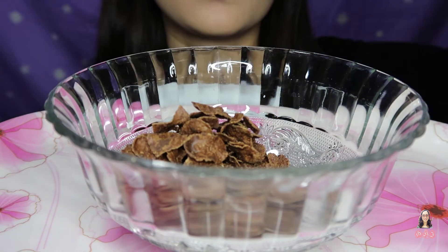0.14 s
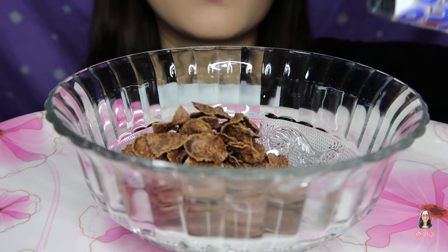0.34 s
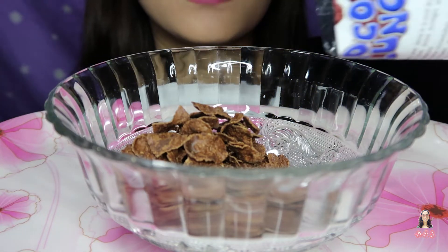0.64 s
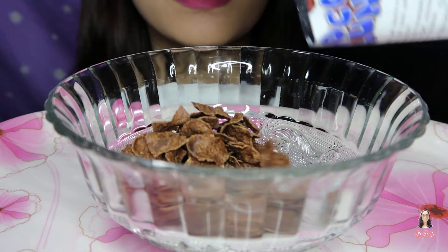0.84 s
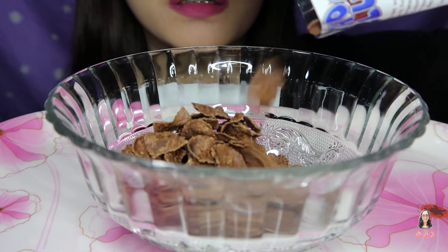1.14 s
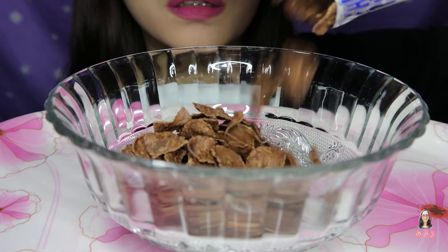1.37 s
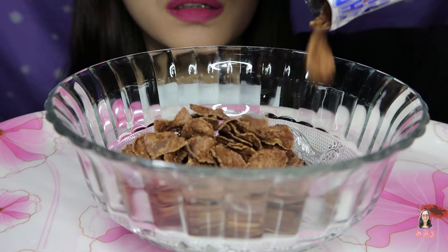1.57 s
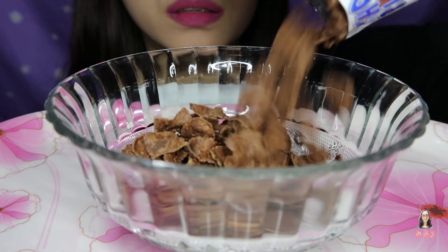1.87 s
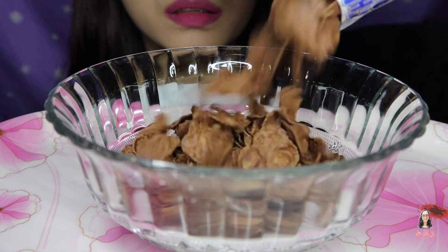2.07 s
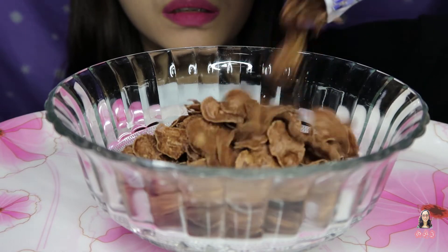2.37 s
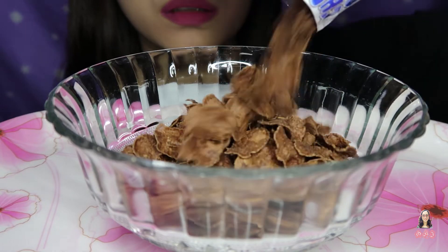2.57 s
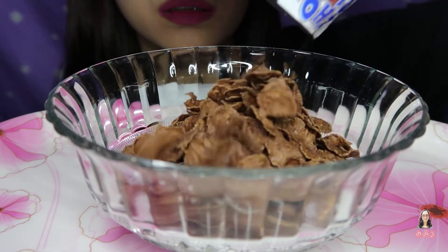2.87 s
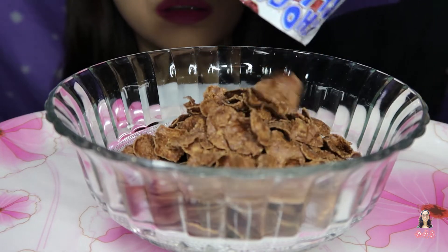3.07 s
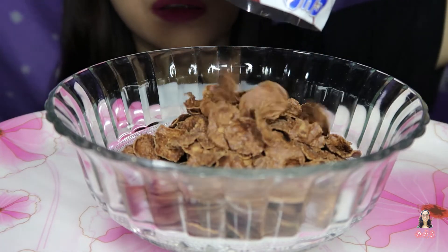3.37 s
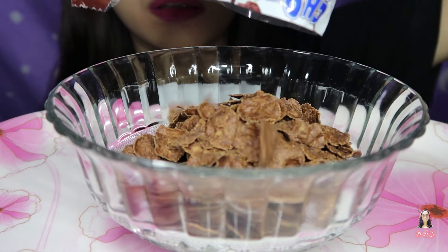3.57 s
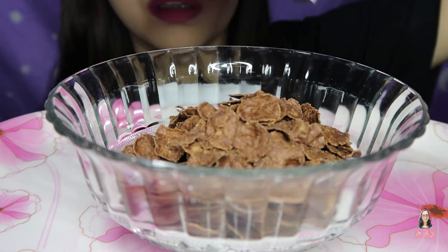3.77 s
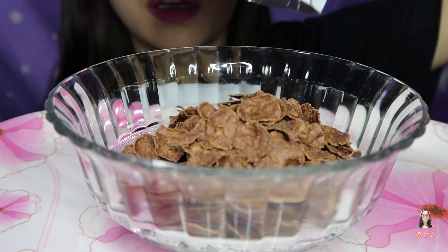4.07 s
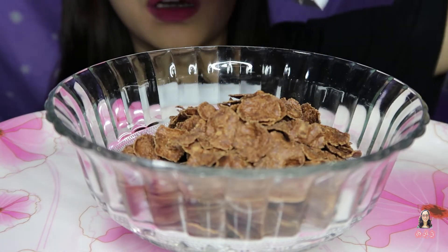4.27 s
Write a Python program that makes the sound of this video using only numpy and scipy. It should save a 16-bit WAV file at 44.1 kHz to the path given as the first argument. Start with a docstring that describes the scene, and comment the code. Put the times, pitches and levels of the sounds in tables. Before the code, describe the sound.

A stiff packet crackles, then dry cereal flakes pour and clatter into a glass bowl that rings briefly, over a low hum.

```python
"""A stiff packet of dry flakes crackles and snaps as it is handled close by, then tipped over a glass bowl.
Its many small cracks excite the packet's hollow; flakes slide out in clumps and clatter on a heap.
Some strike the glass, which rings in a few normal modes until other flakes damp it.
Behind them a machine gives a deep throb and a wavering whine, over faint air noise."""
import sys
import numpy as np
from scipy import signal
from scipy.fft import rfft, irfft, next_fast_len
from scipy.io import wavfile
from scipy.ndimage import uniform_filter1d

SR = 44100
rng = np.random.default_rng(int(sys.argv[2]) if len(sys.argv) > 2 else 0)


def pcm_store(signal):
    """Save signal as 16-bit PCM."""
    levels = np.round(np.clip(np.atleast_2d(signal), -1, 1) * 32767)
    wavfile.write(sys.argv[1], SR, levels.astype(np.int16).T)


N = 194613

# Spectra of a crack's hollow body, midrange and crisp treble: (frequency [Hz], gain [dB])
BODY_SPECTRUM = [(120, -21), (270, -9.5), (540, -2.5), (970, -5), (1300, -18.5), (3400, -63.5)]
MIDDLE_SPECTRUM = [(900, -31.5), (1300, -3), (2400, 0.5), (3300, -9), (4400, -6), (9000, -32.5),
                   (13000, -67.5)]
TREBLE_SPECTRUM = [(3500, -46), (5000, -4.5), (8400, 3.5), (10300, -0.5), (14000, -11.5), (14600, -23)]


def amp(db):
    return 10 ** (np.asarray(db) / 20)


def unit_rms(x):
    return x / np.sqrt(np.mean(x ** 2) + 1e-20)


def add(mix, start_s, sound):
    part = mix[round(start_s * SR):][:len(sound)]
    part += sound[:len(part)]


def blend(a, b, share):
    return (1 - share) * a + share * b


def curves(rows):
    times, *columns = np.transpose(rows)
    return [np.interp(np.arange(N) / SR, times, column) for column in columns]


def coloured(x, points):
    """Minimum-phase filtering: the gain follows (frequency [Hz], gain [dB]) points on a log axis."""
    hz, db = np.transpose(points)
    size = next_fast_len(len(x) + 4096) // 2 * 2
    bin_hz = np.abs(np.fft.fftfreq(size, 1 / SR))
    log_gain = np.interp(np.log(bin_hz + 1), np.log(hz + 1), db) * np.log(10) / 20
    gain = np.exp(np.conj(signal.hilbert(log_gain)))[:size // 2 + 1]
    return irfft(rfft(x, size) * gain, size)[:len(x)]


def resonate(x, hz, width_hz):
    """Resonance: two band-pass stages in cascade, each width_hz wide, whose centre may move."""
    carrier = np.exp(2j * np.pi * np.cumsum(hz * np.ones(len(x))) / SR)
    pole = np.exp(-np.pi * width_hz / SR)
    for _ in range(2):
        x = 2 * (carrier * signal.lfilter([1 - pole], [1, -pole], x / carrier)).real
    return x


def drift(hz):
    """Low-pass noise: a wander of unit rms that changes about hz times a second."""
    spectrum = rfft(rng.standard_normal(N))
    bin_hz = np.arange(len(spectrum)) * SR / N
    return unit_rms(irfft(spectrum * np.exp(-(bin_hz / hz) ** 2), N))


def levelled(x):
    """Division by the running rms holds the level steady, so that an envelope can set it."""
    return x / np.sqrt(uniform_filter1d(x ** 2, SR // 12) + 1e-12 * np.mean(x ** 2))


def patchy(x, depth_db, bins, frames):
    """Random drifting ridges in the short-time spectrum make the rustle streaky and uneven in colour."""
    spectra = signal.stft(x, nperseg=512, noverlap=384)[2]
    ridges = uniform_filter1d(rng.standard_normal(spectra.shape), bins, axis=0)
    ridges = unit_rms(uniform_filter1d(ridges, frames, axis=1))
    return signal.istft(spectra * amp(depth_db * ridges), nperseg=512, noverlap=384)[1][:len(x)]


def bursts(rows, steady_gain, steady_hz, rise_s, t60_s):
    """Summed envelopes that rise, hold and decay, and the power-weighted pitch of bursts and bed."""
    start, length, db, hz = np.transpose(rows)[:, :, None]
    t = np.arange(N) / SR - start
    gains = np.clip(t / rise_s, 0, 1) * amp(db - 60 * np.maximum(t - length, 0) / t60_s)
    power = steady_gain ** 2 + (gains ** 2).sum(0)
    centre_hz = (steady_gain ** 2 * steady_hz + (hz * gains ** 2).sum(0)) / power
    return gains.sum(0), centre_hz


def impulses(per_s, spread_db):
    """A Poisson process: independent clicks of very unequal size."""
    sizes = amp(spread_db * np.minimum(rng.exponential(1, N), 5))
    return sizes * (rng.random(N) < per_s / SR)


def crackle(per_s, spread_db, tail_s):
    """Incoherent addition: each click leaves a decaying scatter of noise, and their powers sum."""
    fade = np.exp(-np.arange(3000) / SR / tail_s)
    power = signal.oaconvolve(impulses(per_s, spread_db) ** 2, fade ** 2)[:N]
    return np.sqrt(np.abs(power)) * rng.standard_normal(N)


def flakes(per_s, spread_db, cycles, count=30):
    """Damped free vibration: each brittle flake rings for a few cycles at a pitch of its own."""
    hits = impulses(per_s, spread_db)
    kind, t = rng.integers(0, count, N), np.arange(800) / SR
    pitches = np.exp(rng.uniform(np.log(5000), np.log(15500), count))
    rings = [np.exp(-t * hz / cycles) * np.sin(2 * np.pi * hz * t) for hz in pitches]
    return sum(signal.oaconvolve(hits * (kind == k), ring)[:N] for k, ring in enumerate(rings))


def hollow(cracks, hz, pouring):
    """Cavity resonance: cracks excite a broad peak in the packet and a narrower one in the bowl."""
    drive = 0.5 * cracks + unit_rms(crackle(per_s=210, spread_db=3, tail_s=0.0031))
    in_bowl = resonate(drive, hz, width_hz=350)
    in_packet = resonate(drive, hz, width_hz=600) + 0.22 * coloured(drive, BODY_SPECTRUM)
    return levelled(blend(unit_rms(in_packet), unit_rms(in_bowl), pouring))


def clatter(cracks, pouring):
    """Source and filter: midrange cracks take the colour of the packet, then that of the heap."""
    # Response of the heap: (frequency [Hz], gain [dB])
    heap_spectrum = [(1100, -18), (1850, -0.5), (2450, -7.5), (2800, -23), (3300, -29.5), (3750, 4),
                     (4200, -11.5), (4900, -38), (6500, -6.5), (9500, -49)]
    drive = cracks + 5.4 * unit_rms(crackle(per_s=120, spread_db=4.5, tail_s=0.022))
    middle = blend(coloured(drive, MIDDLE_SPECTRUM), coloured(drive, heap_spectrum), pouring ** 5)
    return levelled(patchy(middle, depth_db=3.5, bins=4, frames=40))


def crispness(cracks, hz, gain, pouring):
    """Spectral shaping: the treble is dull during handling and brighter during the pour."""
    ringing = unit_rms(flakes(per_s=2300, spread_db=4, cycles=1.5))
    treble = coloured(cracks + 0.82 * ringing, TREBLE_SPECTRUM)
    dull = coloured(treble, [(5000, 8), (9700, 6.5), (12500, -47.5)])
    streaky = patchy(dull, depth_db=12.4, bins=4, frames=85)
    dull = np.where(pouring > 0, unit_rms(streaky), unit_rms(dull))
    bright = coloured(treble, [(9000, -5), (13500, 10)])
    crowding = 0.1 + np.minimum(gain / amp(-49), 1)  # many flakes at once fill the whole treble
    falling = resonate(bright, hz, width_hz=1900) + crowding * bright
    falling = patchy(falling, depth_db=6.6, bins=4, frames=30)
    return gain * levelled(blend(unit_rms(dull), unit_rms(falling), pouring ** 2))


def rustle():
    """Dense random cracks drive three bands; returns their sum and the treble patter alone."""
    # Steady crumpling and sliding: (time [s], midrange level [dB], treble level [dB])
    bed_levels = [(0.0, -63.5, -65.5), (0.18, -75, -79.5), (0.3, -63.5, -67), (0.55, -61.5, -59),
                  (0.82, -60, -60), (1.2, -63.5, -68.5), (1.5, -58.5, -69.5), (1.68, -65.5, -104),
                  (1.85, -53.5, -70), (2.1, -56, -58.5), (2.8, -63.5, -68.5), (3.0, -91, -81),
                  (3.5, -78.5, -87.5), (4.41, -84.5, -100)]
    middle_gain, treble_gain = amp(curves(bed_levels))
    pouring = np.interp(np.arange(N) / SR, [1.15, 1.8], [0, 1])  # 0 handled, 1 streaming into the bowl
    hollow_gain = middle_gain * amp(blend(2, -7, pouring))
    knock_gain, hollow_hz = knocks(hollow_gain)
    clump_gain, treble_hz = clumps(treble_gain)
    crumpling = unit_rms(crackle(per_s=730, spread_db=6.5, tail_s=0.0019))
    stream = unit_rms(crackle(per_s=6400, spread_db=1.5, tail_s=0.0024))
    cracks = blend(crumpling, stream, pouring)
    body = hollow(cracks, hollow_hz, pouring) * (hollow_gain + knock_gain)
    middle = clatter(cracks, pouring) * (middle_gain + amp(-5) * clump_gain + amp(-16.5) * knock_gain)
    patter = crispness(cracks, treble_hz, treble_gain + clump_gain, pouring)
    return body + middle + patter, patter


def machine():
    """Modulation: over a rumble, a whine pulses with a deep throb and wavers with a slower sway."""
    # Parts of the machine's sound: (time [s], sway [dB], throb [dB], rumble [dB], whine [dB])
    part_levels = [(0.0, -34, -31.5, -43.5, -65.5), (1.72, -40.5, -37.5, -74, -61),
                   (4.41, -33.5, -39, -67.5, -60.5)]
    # Harmonics of the whine: (harmonic number, level [dB re first])
    harmonics = [(1, 0.5), (2, -20)]
    throb_hz, whine_hz = 25.15, 349
    sway_gain, throb_gain, rumble_gain, whine_gain = amp(curves(part_levels))
    sway_band = signal.butter(2, [9.48, 18], "band", fs=SR, output="sos")
    sway = levelled(signal.sosfilt(sway_band, rng.standard_normal(N)))
    throb = np.sqrt(2) * np.sin(2 * np.pi * np.cumsum(throb_hz + 0.38 * drift(3.5)) / SR)
    rumble_spectrum = [(20, -23.5), (38, 12.5), (70, -2), (125, -6), (500, -67)]
    rumble = unit_rms(coloured(rng.standard_normal(N), rumble_spectrum))
    turns = np.cumsum(whine_hz + 4 * drift(4.7) + 5 * sway) / SR
    whine = sum(amp(db) * np.sin(2 * np.pi * k * turns) for k, db in harmonics)
    whine *= 1 + 0.5 * throb + 0.7 * sway
    return sway * sway_gain + throb * throb_gain + rumble * rumble_gain + whine * whine_gain


def room_air():
    """Stationary broadband noise, strongest in the bass."""
    # Air noise of the room: (frequency [Hz], gain [dB])
    air_spectrum = [(40, 7.5), (110, -17), (270, -47.5), (900, -39.5), (3000, -43), (13000, -94)]
    return amp(-72) * unit_rms(coloured(rng.standard_normal(N), air_spectrum))


def snaps():
    """Transient decay: a crack, a scatter and a tail from nearby surfaces; the treble dies first."""
    # Snaps of the packet and heavy flakes:
    # (time [s], midrange peak [dB], body [dB re midrange], treble [dB re midrange])
    snap_events = [(0.0124, -32, -10.5, 4), (0.1022, -37.5, 0.5, -5), (0.2256, -31, -9, 2),
                   (0.3164, -36, -7, -11), (0.386, -30.5, -6, -4), (0.417, -31.5, 4.5, -19),
                   (0.54, -23.5, -8, -23), (0.5732, -28, 2, -12), (0.616, -41, 11.5, 0),
                   (0.628, -30.5, 6.5, -4), (0.88, -31.5, -42, -5.5), (1.0483, -40.5, 5, -13),
                   (1.0821, -26, 3.5, -0.5), (1.1038, -35.5, 3, -8), (2.391, -30, -16.5, -21),
                   (4.1027, -37.5, -6.5, -47.5)]
    out, t = np.zeros(N), np.arange(6000) / SR
    for start, db, body_db, treble_db in snap_events:
        resonances = zip(np.geomspace(1000, 16000, num=40), 5 * rng.standard_normal(40))
        noise = coloured(rng.standard_normal(len(t)), list(resonances))
        bands = (BODY_SPECTRUM, body_db, 0.6), (MIDDLE_SPECTRUM, 0, 1), (TREBLE_SPECTRUM, treble_db, 1.1)
        for spectrum, band_db, decay_speed in bands:
            fall = -60 * t * decay_speed
            envelope = amp(12 + fall / 0.0032) + amp(fall / 0.027) + amp(-5 + fall / 0.13)
            part = coloured(noise * envelope, spectrum)
            add(out, start, amp(db + band_db) * part / np.abs(part).max())
    return out


def knocks(steady_gain):
    """Impact excitation: gain and pitch of the hollow as flakes knock inside packet and bowl."""
    # Knocks: (time [s], duration [s], level [dB], pitch [Hz])
    knock_events = [(0.085, 0.019, -55.5, 520), (0.537, 0.027, -43.5, 623), (0.655, 0.032, -39, 780),
                    (0.715, 0.038, -49, 567), (1.038, 0.061, -58, 715), (2.017, 0.04, -59, 610),
                    (2.299, 0.03, -51.5, 693), (2.51, 0.05, -59, 816), (2.621, 0.09, -52.5, 437),
                    (2.707, 0.087, -56, 436), (2.814, 0.007, -54, 493), (3.074, 0.012, -53, 780),
                    (3.386, 0.018, -52.5, 870)]
    return bursts(knock_events, steady_gain, steady_hz=820, rise_s=0.0097, t60_s=0.19)


def clumps(steady_gain):
    """Overlapping impacts merge into bursts: gain and pitch of the treble as clumps slide and land."""
    # Clumps of flakes: (time [s], duration [s], treble level [dB], brightest frequency [Hz])
    clump_events = [(1.046, 0.15, -60, 8000), (1.425, 0.093, -62, 7750), (1.572, 0.042, -55.5, 7500),
                    (1.678, 0.0058, -64.5, 13700), (1.723, 0.017, -59, 9000), (1.864, 0.015, -54, 8500),
                    (1.92, 0.016, -60.5, 12900), (1.947, 0.083, -50, 8540), (2.106, 0.041, -50.5, 8500),
                    (2.178, 0.06, -57, 9000), (2.48, 0.081, -57, 8500), (2.571, 0.11, -57, 8940),
                    (2.681, 0.17, -57, 8300), (2.904, 0.038, -57.5, 11400), (2.964, 0.063, -57.5, 9900),
                    (3.078, 0.0038, -57.5, 8800), (3.239, 0.028, -62.5, 6000), (3.299, 0.029, -60.5, 9700),
                    (3.391, 0.045, -66, 9140), (3.473, 0.021, -56.5, 9900), (3.653, 0.0051, -70, 9200),
                    (3.711, 0.036, -59, 7840), (3.828, 0.0026, -52.5, 8600), (3.901, 0.0028, -71.5, 7700)]
    return bursts(clump_events, steady_gain, steady_hz=8500, rise_s=0.003, t60_s=0.082)


def ticks():
    """Damped resonance: a flake lands on the heap, and its click and scatter drive one broad peak."""
    # Single landings: (time [s], peak level [dB], pitch [Hz])
    landings = [(1.463, -45, 2300), (1.5, -39, 4000), (2.31, -40, 3830), (2.827, -47, 1830),
                (3.175, -38.5, 3960), (3.487, -49, 3860), (3.715, -42, 3950), (3.832, -46, 3840),
                (4.3045, -57.5, 3640)]
    out, t = np.zeros(N), np.arange(6000) / SR
    envelope = amp(14 - 60 * t / 0.013) + amp(-60 * t / 0.16)
    for start, db, hz in landings:
        tick = resonate(rng.standard_normal(len(t)) * envelope, hz, width_hz=hz / 6.2)
        add(out, start, amp(db) * tick / np.abs(tick).max())
    return out


def glass_bowl(patter):
    """Normal modes: strikes ring the glass until flakes damp it; patter keeps it faintly ringing."""
    # Flakes striking the glass: (time [s], level of the low modes [dB], third mode [dB re low],
    # higher modes [dB re low], delay before damping [s])
    strikes = [(1.7244, -48, -2, -2, 0.16), (1.866, -65, 19, 20, 0.11), (1.9716, -32, -9.5, -33.5, 0.3),
               (2.2044, -67.5, 28, 6, 0.18), (2.5023, -31.5, 2.5, 4.5, 0.097),
               (2.6773, -46.5, -9, -3, 0.12), (2.7467, -40, -5.5, 4, 0.27),
               (2.8644, -44.5, 3.5, 1.5, 0.0094), (2.9133, -51.5, 2, 11, 0.073),
               (2.9687, -42.5, 8.5, 10.5, 0.029), (2.9931, -32, -6, -23, 0.14),
               (3.0151, -27, -3, -1, 0.049), (3.081, -34, -10.5, -21, 0.082), (3.3074, -49.5, 5, 7, 0.078),
               (3.716, -51, 1, -2, 0.037), (3.7973, -47, -5.5, -40, 0.061)]
    # Bowl modes: (frequency [Hz], level in group [dB], T60 [s], group: 0 low, 1 third, 2 higher)
    modes = [(845, -21, 0.33, 0), (2134, -3.5, 0.4, 0), (3805, 0, 0.28, 1), (5845, -6.5, 0.098, 2),
             (8155, -7, 0.1, 2), (11280, -10.5, 0.046, 2)]
    out, t = np.zeros(N), np.arange(SR // 2) / SR
    attack = np.minimum(t / 0.0022, 1)
    for start, db, third_db, higher_db, free_s in strikes:
        damping_db = np.clip(60 * (t - free_s) / 0.07, 0, 15)
        for hz, mode_db, t60, group in modes:
            level_db = db + mode_db + (0, third_db, higher_db)[round(group)] - 60 * t / t60 - damping_db
            add(out, start, amp(level_db) * np.sin(2 * np.pi * hz * t) * attack)
    on_glass = np.arange(N) / SR > 1.75
    taps = patter * on_glass * rng.standard_normal(N)
    for hz, mode_db, t60, group in modes:
        level_db = mode_db - (28, 27, 33)[round(group)] - 60 * t / (0.54 * t60)
        out += signal.oaconvolve(taps, amp(level_db) * np.sin(2 * np.pi * hz * t))[:N]
    return out


def scene():
    """Superposition: packet, flakes, bowl, machine and air add in one channel."""
    rustling, patter = rustle()
    air = room_air()
    return (rustling + snaps() + ticks() + glass_bowl(patter) + machine() + air)[None]


def record(dry):
    """Band limiting: a steep linear-phase low-pass removes the highest treble."""
    cutoff_hz = 15750
    low_pass = signal.firwin(511, cutoff_hz, window=("kaiser", 9), fs=SR)
    return signal.oaconvolve(dry, low_pass[None], "same")


dry = scene()
out = record(dry)
pcm_store(out)
```